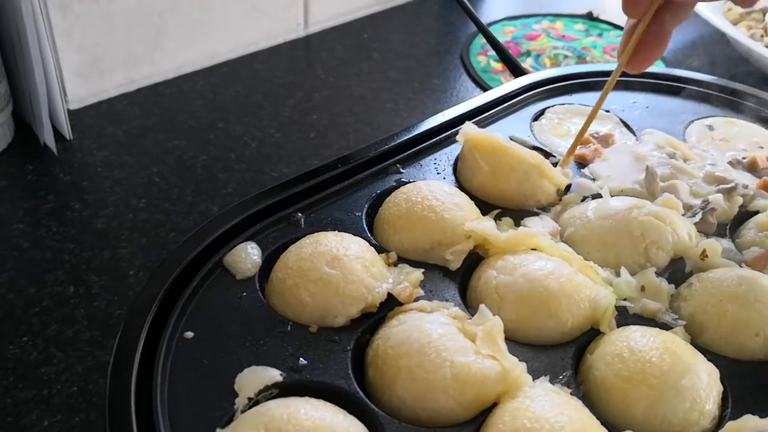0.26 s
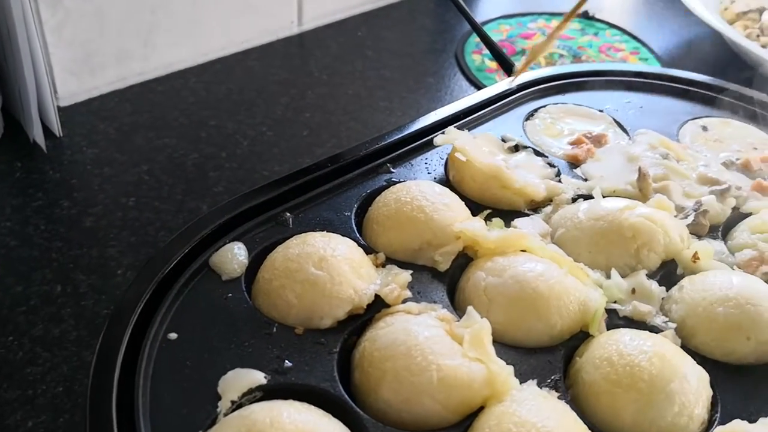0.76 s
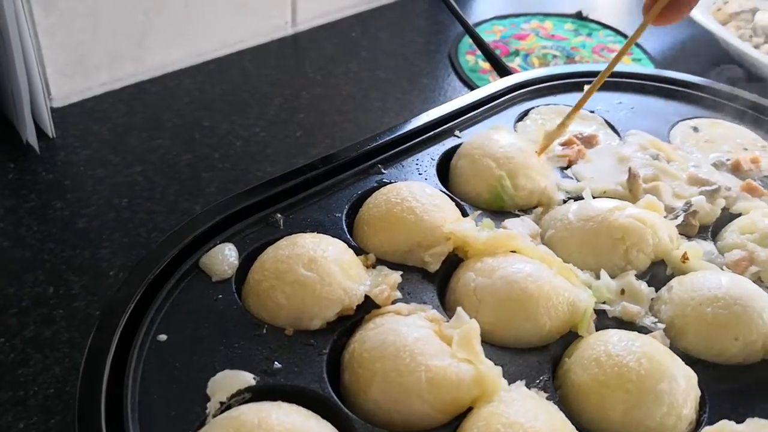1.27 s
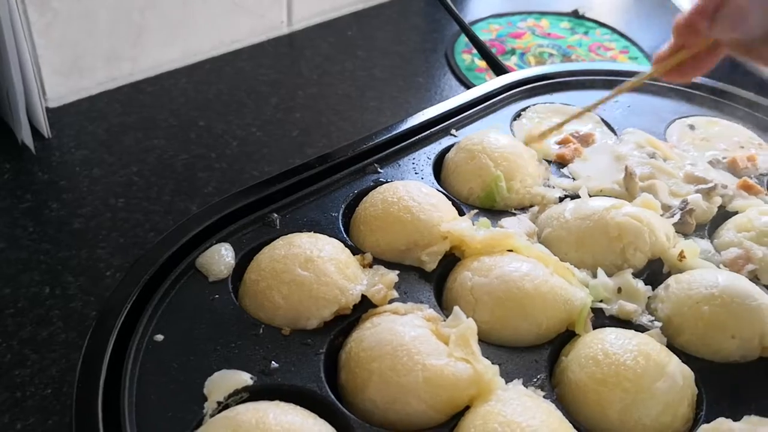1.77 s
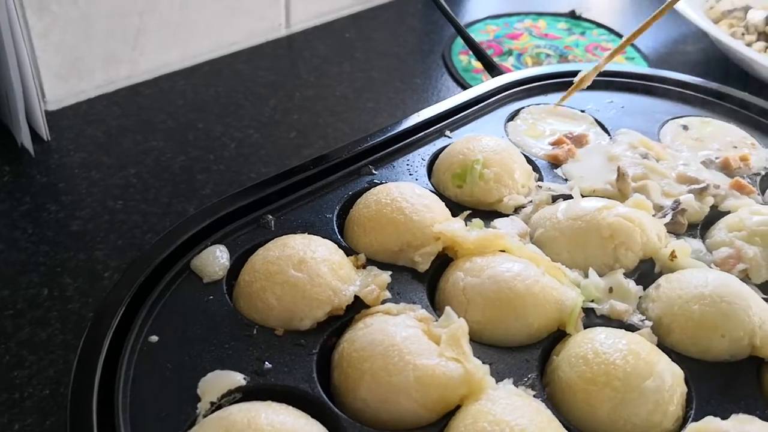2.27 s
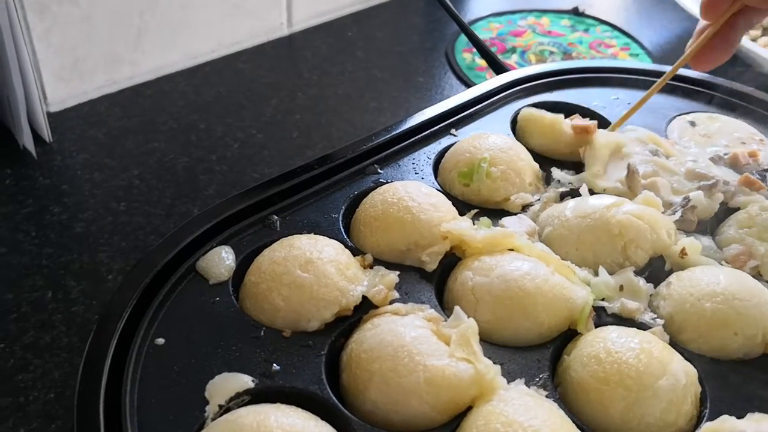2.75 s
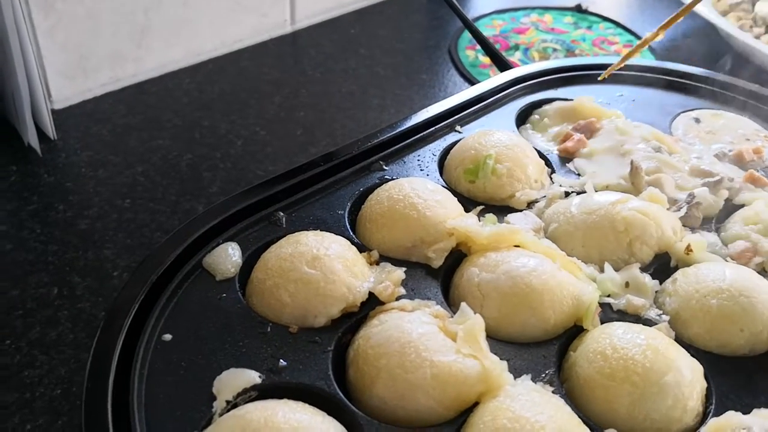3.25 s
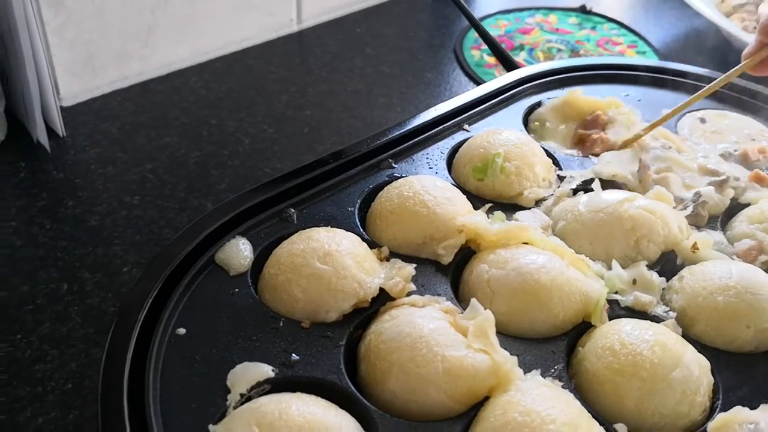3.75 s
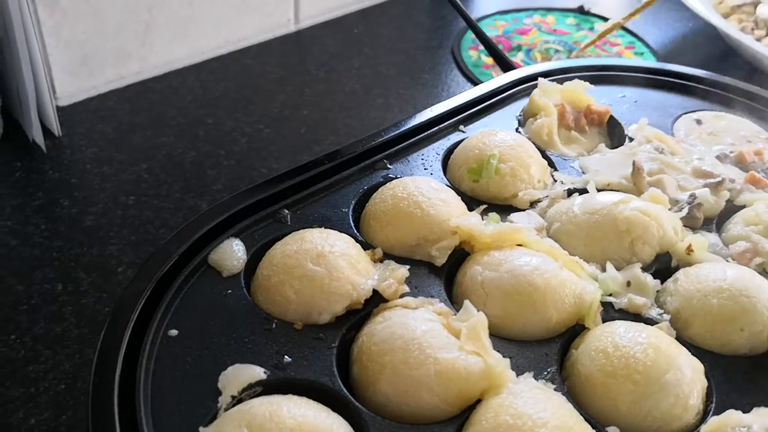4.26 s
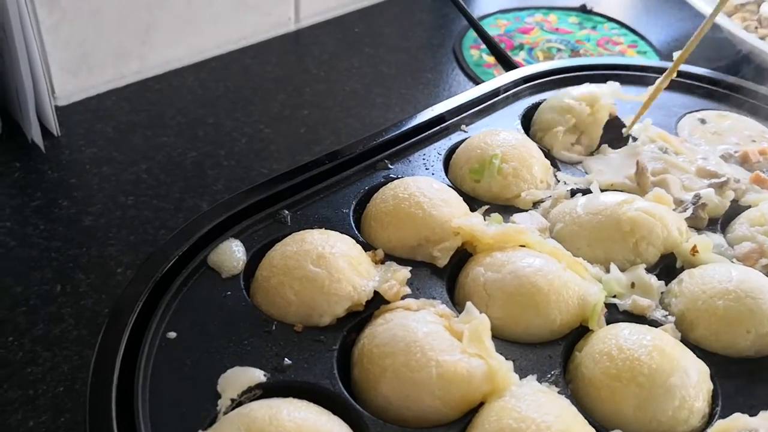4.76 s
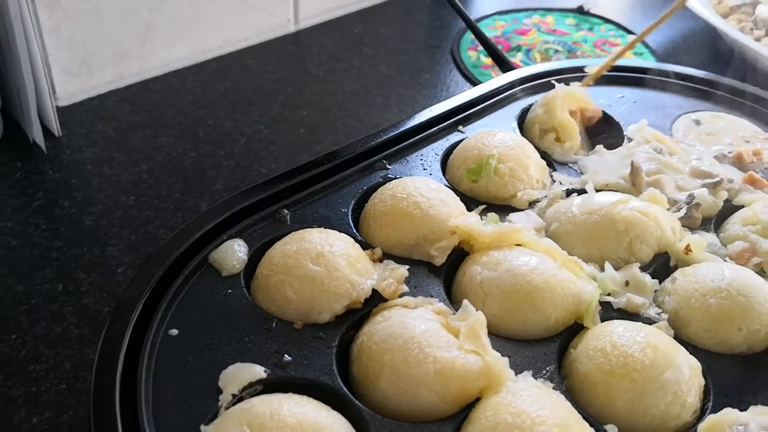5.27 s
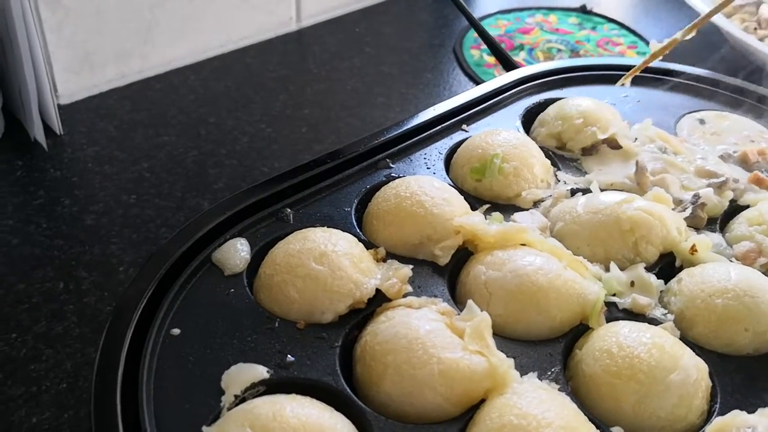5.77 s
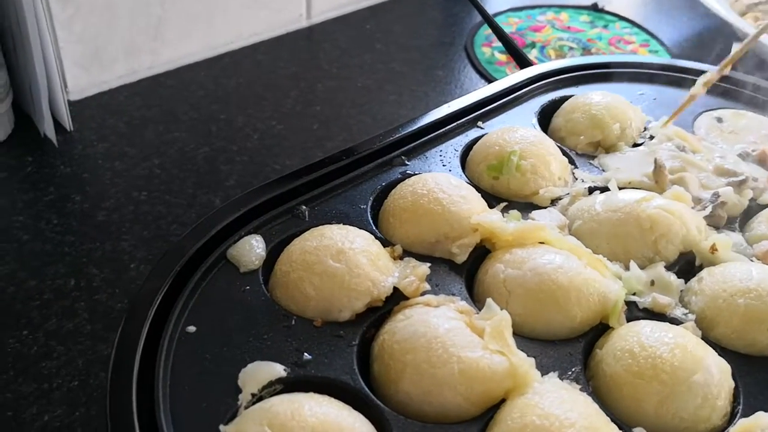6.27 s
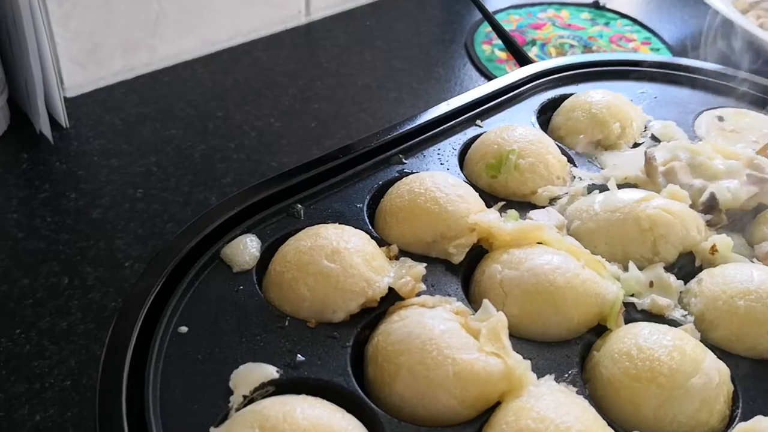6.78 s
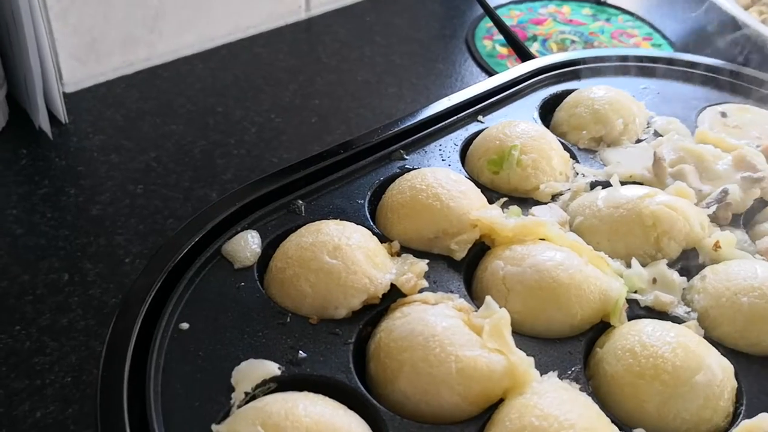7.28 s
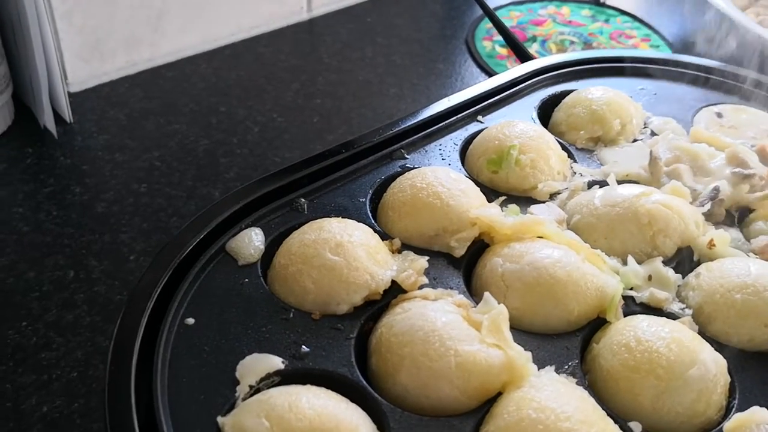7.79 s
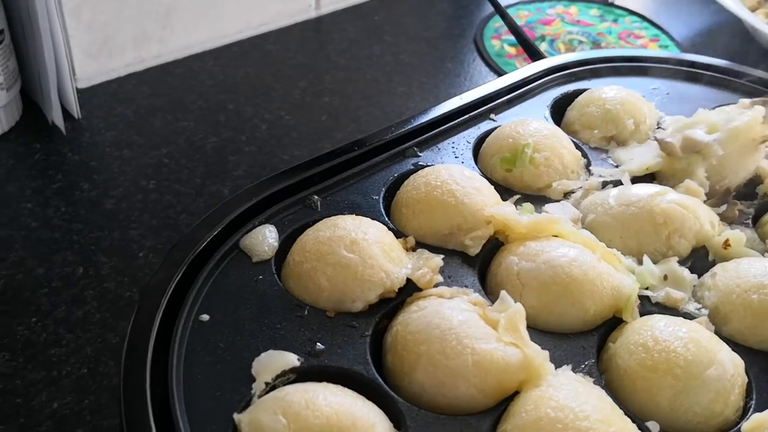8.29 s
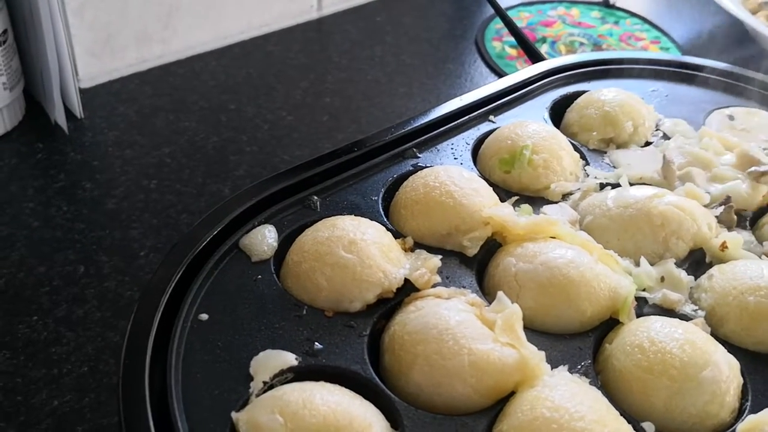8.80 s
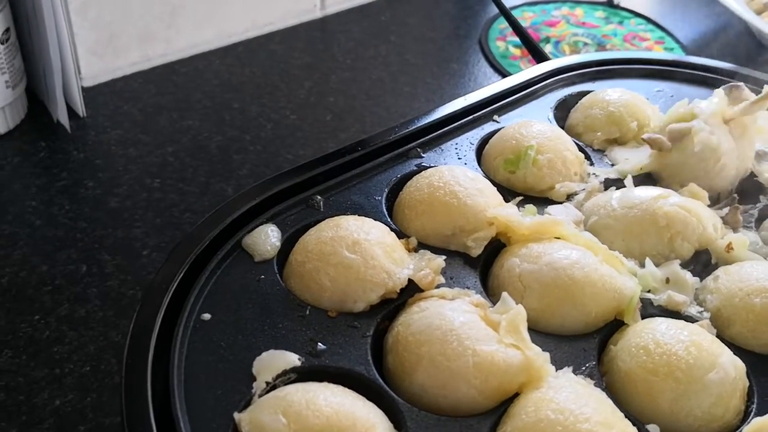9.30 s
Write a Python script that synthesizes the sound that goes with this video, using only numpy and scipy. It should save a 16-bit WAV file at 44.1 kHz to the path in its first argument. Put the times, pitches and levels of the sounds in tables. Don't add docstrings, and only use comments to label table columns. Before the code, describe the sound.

A phone close to a hot plate hears continuous frying: a crisp, wet, mid-to-high fizz of countless steam bubbles, with irregular pops and snapping spits scattered left and right. Short steam hisses slip through. The sizzle swells repeatedly, sparser around three to six seconds, busier towards the end. The room is small and fairly dry. Through the wall come soft road rumble and engine drones, swelling near the end.

```python
import sys
import numpy as np
from scipy import signal
from scipy.fft import rfft, irfft
from scipy.io import wavfile

SR = 44100
rng = np.random.default_rng(int(sys.argv[2]) if len(sys.argv) > 2 else 0)


def master_out(mix):
    frames = np.transpose(np.atleast_2d(mix))
    ceiling = np.clip(frames, -1, 1)
    pcm = np.round(ceiling * 32767).astype(np.int16)
    wavfile.write(sys.argv[1], SR, pcm)


def rack_gain(trim_db):
    fader = np.asarray(trim_db, float)
    return 10 ** (fader / 20)


N = 420713


def rms_one(x):
    return x / np.sqrt(np.mean(x ** 2) + 1e-20)


def in_time(rows):
    s, *columns = np.transpose(rows)
    return [np.interp(np.arange(N) / SR, s, column) for column in columns]


def drift(rate_hz):
    r = np.exp(-80 * np.pi * rate_hz / SR)
    slow = signal.lfilter([1], [1, -2 * r, r * r], rng.standard_normal(N // 40 + 2002))
    slow = rms_one(slow[2000:])
    return np.interp(np.arange(N) / 40, np.arange(len(slow)), slow)


def ring(clicks, hz, cycles):
    r = rack_gain(-60 * hz / (cycles * SR))
    w = 2 * np.pi * hz / SR
    return signal.lfilter([1 - r, 0, r - 1], [1, -2 * r * np.cos(w), r * r], clicks + 1e-18)


def coloured(x, *spectra, size=4096):
    log_hz = np.log(np.maximum(np.arange(size // 2 + 1) * SR / size, 1))
    level_db = 0
    for spectrum in spectra:
        hz, db = np.transpose(spectrum)
        level_db = level_db + np.interp(log_hz, np.log(hz), db)
    cepstrum = irfft(np.log(rack_gain(level_db)))
    cepstrum[1:size // 2] *= 2
    kernel = irfft(np.exp(rfft(cepstrum[:size // 2], size)))
    out = signal.oaconvolve(np.atleast_2d(x), kernel[None], axes=1)
    return out[:, :x.shape[-1]].reshape(x.shape)


def placed(x, lag, pan_db):
    return np.array([np.roll(x, int(round(lag))) * rack_gain(pan_db / 2), x * rack_gain(-pan_db / 2)])


def tone(hz, level_db, wobble_db):
    level = np.sqrt(2) * rack_gain(level_db + wobble_db * drift(10.0))
    return level * np.sin(2 * np.pi * np.cumsum(hz) / SR + rng.uniform(0, 5.32))


# pitch_hz, level_db
LEFT_PORT = [(300, -45.5), (600, -17), (900, -0.5), (1600, -2), (2600, -2.5), (3200, -7.5), (4200, -9.5),
             (7600, -9.5), (8200, -15.5), (9300, -6), (10500, -11), (12500, -22), (16000, -16),
             (16500, -70.5)]
# pitch_hz, level_db
RIGHT_PORT = [(400, -25.5), (1100, -2), (1650, 1.5), (2600, -2), (3100, -4), (4100, -8.5), (6200, -5),
              (7600, 1.5), (8000, -3), (8500, -8.5), (10000, -21), (12500, -20), (16000, -14.5),
              (16500, -60)]
# pitch_hz, level_db
PLATE_COLOUR = [(2550, -1), (2900, -2.5), (3400, 0.5), (5100, 0), (5850, 1), (6250, -1.5), (6700, -1.06),
                (7900, 1)]


def ports(x):
    left = coloured(x[0], LEFT_PORT, PLATE_COLOUR)
    right = coloured(x[1], RIGHT_PORT, PLATE_COLOUR)
    return np.array([left, right])


# crest_s, rise_s, big_bubbles_db, small_bubbles_db
SURGES = [(0.0, 0.033, -1, 9), (.38, 0.14, 5, 8), (.52, 0.2, 1, 7.5), (.93, 0.62, 2, 2),
          (1.3, 0.25, 4.5, 10.5), (1.49, 0.16, 2.5, 5), (1.61, 0.051, 0, 7.5), (1.72, 0.11, 3.5, 5),
          (1.9, 0.11, -1.5, 9.5), (2.07, 0.22, 8, 4.5), (2.15, 0.073, -5, -1.5), (2.32, 0.093, 2.5, 5),
          (2.88, 0.26, 4.5, 6.5), (4.04, 0.043, 0, 2), (4.361, 0.21, 1, 2), (4.6, 0.083, 1, 8),
          (4.73, 0.087, 5, 11), (4.98, 0.29, 0.5, 3), (5.5, 0.27, 1.5, 6.5), (5.56, 0.049, 3, -4),
          (5.93, 0.33, 3, 0), (6.29, 0.07, 2, 3.5), (6.55, 0.12, 1, 3), (6.79, 0.15, 6.5, 7),
          (6.87, 0.083, 5, 4.5), (7.561, 0.96, 2, 1.5), (8.01, 0.14, 0.5, 2), (8.49, 0.43, 3.5, 2),
          (8.89, .12, 1, 3), (9.23, 0.28, 4.5, 4)]


def vigour():
    t, swell = np.arange(0, N, 40) / SR, 0
    for s, rise, big_db, small_db in SURGES:
        shape = np.interp(t, [s - rise, s, s + rise], [0, 1, 0])
        swell = swell + shape * np.array([[big_db], [small_db]])
    return np.repeat(swell, 40, axis=1)[:, :N] - 51.5


def bubbles(per_s, low_hz, high_hz, cycles, size_db, clump_db, far_db, count):
    sizes = rack_gain(size_db * np.minimum(rng.exponential(1, N), 4.6)) * rng.choice([-1, 1], N)
    chance = per_s / SR * rack_gain(clump_db * (drift(9) + drift(60)))
    clicks = sizes * (rng.random(N) < chance)
    dealt, near, far = rng.integers(0, count, N), 0, 0
    wash = rng.standard_normal((2, 2, N))
    for k, hz in enumerate(np.geomspace(low_hz, high_hz, count)):
        lag, pan = rng.standard_normal(2)
        near = near + placed(ring(clicks * (dealt == k), hz, cycles), 2.1 + 3.5 * lag, 0.58 * pan)
        if k % 4 == 2:
            far = far + ring(wash[k // 4 % 2], hz, cycles / 2)
    return rms_one(ports(rms_one(near) + rack_gain(far_db) * rms_one(far)))


def frying():
    big_db, small_db = vigour()
    big = bubbles(5000, 1660, 3120, cycles=6.1, size_db=3.0, clump_db=2.0, far_db=-4.5, count=10)
    small = bubbles(6000, 2410, 8850, cycles=4.5, size_db=4.0, clump_db=1.5, far_db=-5.5, count=8)
    tiny = bubbles(6000, 7440, 9800, cycles=3.4, size_db=2.0, clump_db=2.0, far_db=-14.5, count=6)
    crackle = bubbles(200, 1830, 9500, cycles=2.0, size_db=2.2, clump_db=2.0, far_db=-20, count=6)
    crackle_db = -60.5 + 0.8 * ((big_db + small_db) / 2 + 50)
    tiny_db = -55.5 + 0.088 * (small_db + 62.0)
    crowds = rack_gain(big_db - 1.5) * big + rack_gain(small_db - 3.0) * small
    return crowds + rack_gain(tiny_db) * tiny + rack_gain(crackle_db) * crackle


# time_s, firing_hz, level_db
LORRY = [(0.0, 61, -51.5), (.4, 60.2, -58), (0.95, 60.7, -63), (1.41, 59.8, -45), (1.54, 58.66, -56),
         (2.28, 59.4, -50.5), (2.44, 57.9, -72), (2.68, 58, -69), (3.29, 56.5, -76), (5.55, 56.9, -59.5),
         (6.64, 56.54, -61), (6.75, 57.2, -50), (7.2, 56.85, -43), (7.81, 56.8, -48.5), (8.05, 56.34, -59),
         (8.56, 56.5, -41.5), (9.01, 54.85, -40.5), (9.54, 51.2, -46.5)]


def lorry():
    hz, first_db = in_time(LORRY)
    second_db = -64 + 0.62 * (first_db + 49.5)
    third_db = -79 + 1.44 * np.arange(N) / SR
    return tone(hz, first_db, 0.95) + tone(2 * hz, second_db, 0.63) + tone(3 * hz, third_db, 2.3)


def fan():
    return tone(np.full(N, 243.2), -73, 2.9)


# time_s, level_db
ROAD = [(0, -57), (2.5, -57.5), (3.5, -56), (4.6, -54), (6.6, -57.5), (7.2, -54.5), (7.9, -52),
        (8.48, -42.5), (9.01, -54), (9.3, -51.5), (9.54, -43)]
# pitch_hz, level_db
ROAR = [(40, -24.5), (75, -1.5), (100, -0.5), (150, -1), (200, -6), (260, -27), (500, -63), (3000, -130)]
# pitch_hz, level_db
DEEP = [(10, -18), (28, -10), (40, -16), (48, -3), (70, -22), (200, -67), (900, -130)]


def road():
    roar_db, = in_time(ROAD)
    swing_db = roar_db + 56
    deep_db = -67 + swing_db
    hum_db = -64.5 + 0.46 * swing_db
    deep, roar, hum = rng.standard_normal((3, N))
    hum_spectrum = [(150, -19.5), (230, 3.0), (300, -2.0), (420, -9.5), (800, -35.5), (4000, -120)]
    out = rack_gain(deep_db + 0.5) * rms_one(coloured(deep, DEEP))
    out += rack_gain(roar_db - 2.0) * rms_one(coloured(roar, ROAR))
    return out + rack_gain(hum_db - 5.0) * rms_one(coloured(hum, hum_spectrum))


# pitch_hz, level_db
TOWN = [(20, -37), (60, -13.5), (150, -1.5), (250, -5.5), (310, -5), (400, -17.5), (520, -21), (750, -10),
        (1050, -7), (1500, -21), (3000, -55), (9000, -120)]


def town():
    middle, side = rng.standard_normal((2, N))
    side_spectrum = [(20, -5), (100, 1), (200, -2), (350, -8.5), (520, -7.5), (800, -4.0),
                     (1300, -11), (3000, -70), (9000, -120)]
    differ = rack_gain(-66) * rms_one(coloured(side, side_spectrum))
    return rack_gain(-61.5) * rms_one(coloured(middle, TOWN)) + differ * [[1], [-1]]


def scattered(rows):
    return [(s, db, hz * (1 + 0.03 * rng.standard_normal()), pan) for s, db, hz, pan in rows]


# crest_s, peak_db, pitch_hz, left_right_db (as heard)
SMALL_POPS = [(0.004, -35, 2190.0, 2), (0.0581, -42, 2460.0, 1), (0.1487, -38, 2460.0, -6),
              (0.185, -39, 2190.0, -2), (0.1961, -35, 2430, -4), (0.338, -32.5, 2460, -5),
              (0.4494, -32, 2350.0, -3), (0.643, -34, 2320.0, -12), (1.5882, -35, 2290.0, -2),
              (1.7216, -38, 2160.0, -2), (1.8219, -33.5, 2470, -5), (2.0885, -31, 2133, -11),
              (2.2067, -42, 2560.0, -4), (2.2384, -34.5, 2060.0, -7), (2.315, -36, 2100, -3),
              (2.3318, -33, 2050.0, -7.5), (2.4482, -32, 2600.0, -7), (2.5196, -27.5, 2410.0, -6),
              (2.7847, -38, 2520.0, -6), (2.9111, -34, 2380, 6), (3.4152, -42, 2495, 5),
              (3.5726, -34, 2780, -8), (3.6934, -34.5, 2360.0, 5), (3.7986, -42, 2330, 2),
              (4.1286, -36, 1990.0, 0), (4.3218, -33, 2090.0, -8), (4.7256, -33, 2630.0, -2),
              (4.9802, -37, 2188, -1.5), (5.3673, -38, 2438, -4), (5.516, -38, 2120.0, -7),
              (5.8732, -39, 2100, -2), (6.4633, -35, 2202, -3), (6.5546, -32.5, 2480, 4),
              (6.7482, -32.5, 2380.0, 1), (6.8437, -31, 2000.0, -9), (7.0604, -33.5, 2450.0, -6),
              (7.171, -31, 2396, -8), (7.2096, -34, 2670, -5), (7.3257, -34.5, 2200.0, -1),
              (7.4011, -39, 2100, -4.5), (7.4935, -30, 2500, -8), (7.5146, -32, 2490.0, 1),
              (7.563, -32, 2640, -3), (7.5815, -31, 2320.0, -9), (7.958, -36, 2110, -1),
              (8.352, -36, 2230.0, 8), (8.7525, -36, 2426, 11), (8.774, -38, 2232, 7),
              (8.922, -37, 2060.0, -10), (9.2615, -34, 2565, -10)]


def small_pops():
    return [(s, db, hz, pan + 3) for s, db, hz, pan in SMALL_POPS]


# crest_s, peak_db, left_right_db (as heard)
SMALL_SPITS = [(0.004, -22.5, 7), (0.5093, -25, -9.5), (0.785, -26.5, -13), (0.9584, -36, -7),
               (0.9834, -37, -18), (1.4163, -30, -18), (1.6039, -34, -9), (2.0404, -29, -11),
               (2.0488, -37, -5), (2.2389, -35, -9), (2.2882, -26.5, -7), (2.3674, -38, -11),
               (2.3816, -30, -7), (2.7585, -23.5, -7.5), (2.8505, -27, -8), (2.9086, -32, -10),
               (2.945, -32, -2), (3.1007, -28, -10), (3.2339, -35, -8), (3.2654, -31, 1), (3.4155, -31, -1),
               (3.5198, -30, -14), (4.0228, -36, -6), (4.0398, -36, -15), (4.061, -30, -14),
               (4.3466, -34, 2), (4.9801, -35, -7), (5.0635, -31, -11), (5.141, -27, 0), (5.2486, -35, -4),
               (5.3673, -34, -7), (5.5379, -29, -12), (5.6085, -36, -12), (5.6347, -31, -6),
               (5.9166, -31, -6), (6.1251, -34, -2), (6.5546, -28, -9), (6.617, -28, -16),
               (6.9808, -29, -9), (7.3328, -32, 4), (7.4874, -27, -10), (7.6575, -31, -10),
               (7.7991, -30, -11), (7.9197, -33, -15), (7.9887, -29, -11), (8.0407, -30, -15),
               (8.0456, -28, -13), (8.1215, -35, -8), (8.3234, -28, -12), (8.4078, -39, -10),
               (8.439, -32, -13), (8.477, -31, -13), (8.5057, -34, -5), (8.5107, -33, -7),
               (8.6093, -31, -11), (8.8611, -34, -10), (9.026, -35, -8), (9.0928, -35, -8),
               (9.1487, -31, -5), (9.4387, -33, -6.5)]


def small_spits():
    return scattered([(s, db, 6270, pan + 6) for s, db, pan in SMALL_SPITS])


# crest_s, peak_db, left_right_db
SPITS = [(0.0743, -21.5, -14), (0.632, -25, -5), (1.234, -25, 5), (1.8219, -24.5, 12), (2.356, -26.5, 0),
         (2.474, -18, -9), (2.519, -24.5, -1), (2.7576, -26, 4), (2.943, -34, 1), (3.156, -26.5, 9),
         (3.6361, -23.5, 4), (3.7984, -28, -10), (4.3139, -28, 7.5), (4.98, -27, -4), (5.876, -23, -10),
         (6.2577, -28, 3), (6.617, -29, -9), (6.78, -23, -5), (6.8818, -23, 15), (7.178, -28, 12),
         (7.99, -33, -3), (8.29, -21.5, -7), (8.492, -24.5, 5), (8.753, -24, 12), (8.844, -23, 1),
         (8.912, -20, -14), (9.132, -27, -3), (9.2331, -22, -3), (9.439, -38, 17), (9.4905, -21, 0)]


def spits():
    return scattered([(s, db, 6410, pan) for s, db, pan in SPITS])


# start_s, peak_db, left_right_db
TICKS = [(0.1565, -53, 4), (1.2326, -43, 6.0), (1.4691, -42, 6), (1.8225, -43, 5.0), (2.0647, -40, 0),
         (2.4728, -31, 0), (2.5178, -38, -3), (2.7571, -41, 4.5), (2.9432, -42, 3.0), (3.1544, -46, -1),
         (3.233, -48, 3), (3.6355, -46, 9), (3.7973, -47, 7), (4.3124, -41, -1), (4.618, -44, 1),
         (4.9787, -41, 0), (5.1392, -43, 2), (6.0575, -44, -2), (6.257, -37, 3), (6.8952, -55, 2.0),
         (7.1774, -31, 15), (7.514, -33, -11), (7.684, -38, 12), (7.89, -45, -1), (7.9877, -36, 1),
         (8.2752, -43, 2.5), (8.751, -46, 7.0), (8.9091, -45, 1), (9.0089, -45, 1.5), (9.4375, -41, 0)]


def ticks():
    return scattered([(s + 0.0009, db + 9, 11150, pan) for s, db, pan in TICKS])


# crest_s, peak_db, pitch_hz, left_right_db
POPS = [(0.2247, -30, 1640, 3), (0.391, -23, 3540, 3), (0.937, -23, 3230, -6), (0.9418, -15.5, 3130, -1),
        (1.265, -22, 3900, -22), (1.696, -24, 2812, -10), (2.0482, -18, 2962, -2),
        (2.0662, -18.5, 2010, -5), (2.0973, -21, 2370, -6), (2.4737, -20.5, 4020, -8),
        (2.5189, -26, 2925, -10), (2.9443, -24, 3874, 0), (4.0364, -24, 3530, -5),
        (4.3136, -27.5, 2230, -1), (4.492, -16, 3276, 1), (5.9591, -21, 3154, 0), (6.181, -22, 3007, 0.5),
        (6.6891, -25.5, 2580, -0.5), (6.727, -30, 4490, 0), (6.870, -26.5, 3920, 0),
        (6.9435, -22.5, 2700, 1), (7.9888, -18.5, 3180, -3), (8.0738, -18, 3160, 1),
        (8.1211, -25.5, 2490, -6), (8.399, -22, 4236, -4), (8.4565, -24.5, 2955, -6),
        (8.5055, -23, 3080, 0), (8.5098, -25, 2970, -2), (8.629, -21.5, 3000, 4), (9.0205, -26, 3200, -2),
        (9.0532, -22, 2950, 2.5), (9.383, -22.5, 2880, -3)]


def big_pops():
    return POPS


# crest_s, pitch_hz
FAR_POPS = [(0.643, 2540), (1.73, 1863), (2.3102, 3420), (2.594, 3120), (3.5338, 2720), (4.01, 2270),
            (4.756, 2200), (5.2483, 3420), (4.3824, 2560), (4.6184, 4270), (4.7254, 3980), (5.667, 2380),
            (7.5145, 4200), (6.3646, 2160), (6.9033, 3230), (6.9794, 3240), (7.282, 2470), (7.566, 3300),
            (7.644, 2065), (8.599, 2890), (8.7495, 3290), (8.861, 3100), (9.3534, 3040), (9.439, 2390)]


def far_pops():
    return [(s, -30, hz, -1) for s, hz in FAR_POPS]


# crest_s, peak_db, left_right_db
NEAR_SPITS = [(0.6863, -24, -7), (1.189, -25, -14), (1.196, -24, -8), (1.3177, -14.5, -14),
              (1.325, -23, -8), (1.357, -25, -12), (1.151, -32, -6), (1.394, -28, -6), (1.428, -23, -11),
              (1.581, -28, -6), (1.4467, -15.5, -27), (1.47, -13, -20), (1.917, -23.5, -7),
              (1.9742, -22, -4), (2.1844, -26, -8), (3.5075, -26, -11), (5.862, -28, -8), (5.905, -27, -6),
              (6.8973, -13, -9), (7.158, -23, -6), (7.4636, -26.5, -6), (7.863, -28, -20),
              (7.8924, -12.5, -20), (7.92, -23, -16), (8.0042, -21, -13), (8.247, -24, -12),
              (8.252, -35, -12), (8.615, -24, -9), (9.126, -21, -7), (9.2811, -23, -8),
              (9.2908, -25.5, -8.5), (9.4723, -20.5, -7), (9.505, -21.5, -1)]


def near_spits():
    return scattered([(s, db, 6000, pan) for s, db, pan in NEAR_SPITS])


def burst(peak_db, hz):
    click = np.zeros(200)
    click[0] = -1
    crack = signal.lfilter([1, -2, 1], [1], click)
    if 5000 < hz < 8000:
        cycles, cup_db = 3.6, -27
    else:
        cycles, cup_db = 2.9 * rack_gain(-0.2 * (peak_db + 21.0)), -11.5

    def body(body_hz):
        return ring(ring(click, body_hz, cycles), body_hz, cycles)

    out = body(hz) + rack_gain(-30) * crack - rack_gain(cup_db) * body(hz / 2)
    if hz < 5000:
        out = out + rack_gain(-7) * body(1.55 * hz)
    return out


def bursts(gain_db, size=4000):
    rows = small_pops() + small_spits() + spits() + ticks() + big_pops() + far_pops() + near_spits()
    t = np.arange(size) / SR
    plate = rack_gain(-17 - 60 * t / 0.012) * (t > 0.0005)
    kitchen = rack_gain(-34.5 - 60 * t / 0.2) * (t > 0.005)
    heard = []
    for s, peak_db, hz, pan_db in rows:
        bare = burst(peak_db, hz)
        tail = rng.standard_normal((2, size)) * (plate + kitchen)
        direct = placed(np.pad(bare, (0, size - len(bare))), 1.5 + 3.5 * rng.random(), pan_db)
        heard.append(direct + signal.fftconvolve(bare[None], tail, axes=1)[:, :size])
    heard = ports(np.swapaxes(heard, 0, 1)).swapaxes(0, 1)
    out = np.zeros((2, N + size))
    for (s, peak_db, *_), pop in zip(rows, heard):
        at = round(s * SR) - np.abs(pop).sum(axis=0).argmax()
        out[:, at:at + size] += pop / np.abs(pop).max() * rack_gain(peak_db + gain_db)
    return out[:, :N]


# time_s, pitch_hz, level_db
VAN = [
    (.45, 184.3, -75),
    (.75, 183, -54),
    (1.0, 182, -63.5),
    (1.4, 179.4, -60.5),
    (2.0, 174.6, -64),
    (2.7, 168, -67.5),
    (3.1, 159, -65),
]


def van():
    return tone(*in_time(VAN), 3.3)


# crest_s, length_s, pitch_hz, level_db, left_right_db
JETS = [
    (0.51, 0.053, 7200, -53, -3),
    (1.285, 0.11, 4400, -51.5, -13),
    (1.285, 0.075, 3370, -49, -8),
    (2.088, .025, 2000, -49, -2),
    (4.74, 0.047, 4530, -55, -2),
    (6.76, 0.075, 1630, -50, -5),
    (6.85, .04, 1880, -50, -8),
    (6.84, 0.051, 6100, -49, 5),
    (5.9, 0.07, 7100, -54, -1),
    (6.48, 1.4, 2510, -62, 17.5),
]


def jets():
    t, out = np.arange(N) / SR, 0
    air = rng.standard_normal((2, N)) * rack_gain(2.5 * drift(45))
    for s, length, hz, db, pan_db in JETS:
        hiss = rms_one(ring(ring(air[0] + 0.6 * air, hz, 7), hz, 7))
        level = rack_gain(db + np.array([[pan_db], [-pan_db]]) / 2)
        out = out + level * np.exp(-((t - s) / length) ** 2) * hiss
    return out


# time_s, pitch_hz, level_db
CAR = [
    (3.1, 137.4, -73),
    (3.6, 137.6, -61.5),
    (4.9, 138.4, -63.5),
    (5.7, 131, -60),
    (6.7, 135.1, -60.5),
    (7.8, 147.3, -60),
    (8.3, 195.6, -55.5),
    (9.0, 207.1, -62),
    (9.54, 200.3, -53),
]


def car():
    return tone(*in_time(CAR), 1.3)


# crest_s, length_s, pitch_hz, level_db
JOLTS = [
    (3.5, 0.16, 86.5, -55.5),
    (4.603, 0.072, 42, -53),
    (7.948, 0.11, 43, -54),
    (8.42, 0.085, 100, -51.5),
    (8.556, 0.069, 127, -51),
    (9.246, 0.077, 40.12, -47.5),
]


def jolts():
    t, out = np.arange(N) / SR, 0
    for s, length, hz, db in JOLTS:
        rumble = rms_one(ring(rng.standard_normal(N), hz, 12.0))
        out = out + rack_gain(db) * np.exp(-((t - s) / length) ** 2) * rumble
    return out


def scene():
    street = lorry() + fan() + road() + town() + van() + car() + jolts()
    return frying() + street + bursts(gain_db=1.0) + jets()


def low_pass(x):
    return signal.sosfilt(signal.butter(12, 16470, fs=SR, output="sos"), x)


def record(dry):
    hiss = coloured(rng.standard_normal(dry.shape), [(1000, -33), (4000, 6), (15100, 3.5), (15400, -58)])
    return low_pass(dry + rack_gain(-67) * hiss)


dry = scene()
out = record(dry)
master_out(out)
```